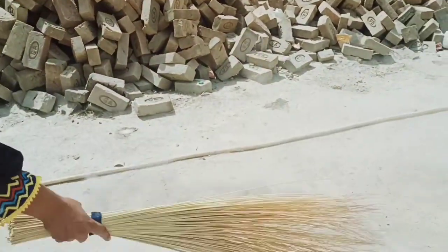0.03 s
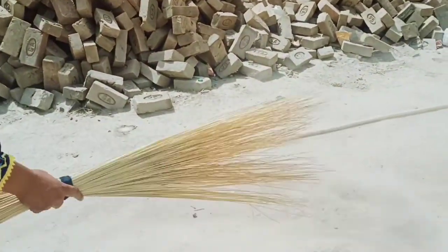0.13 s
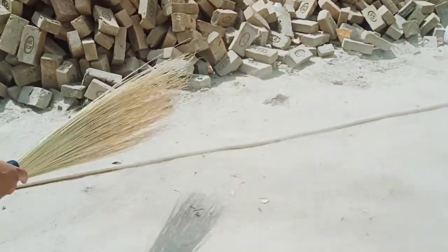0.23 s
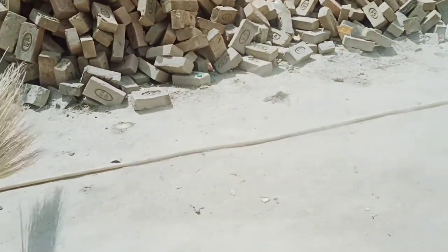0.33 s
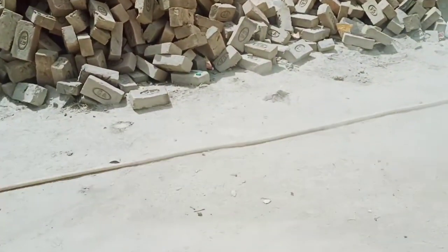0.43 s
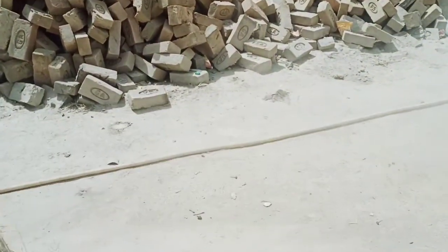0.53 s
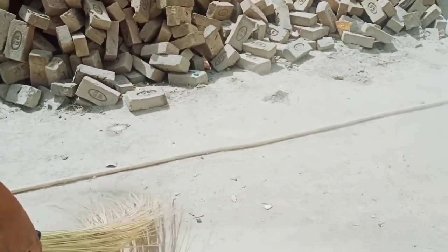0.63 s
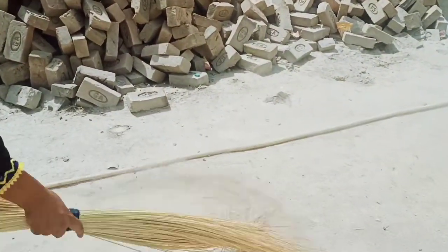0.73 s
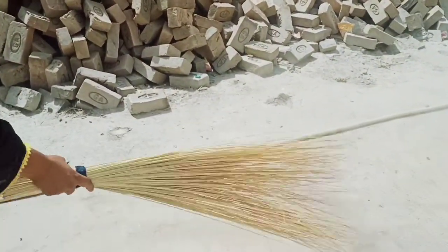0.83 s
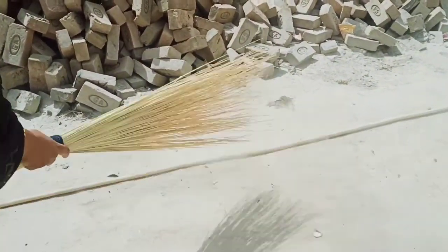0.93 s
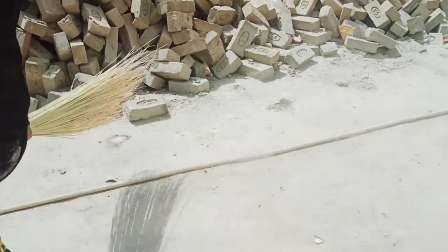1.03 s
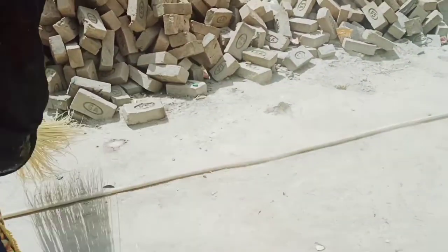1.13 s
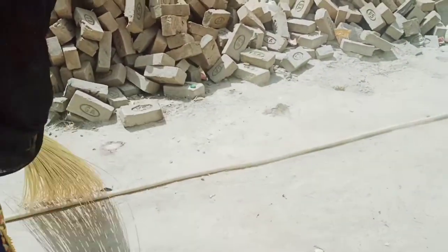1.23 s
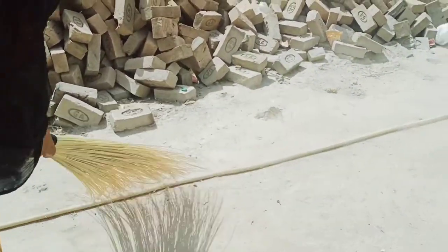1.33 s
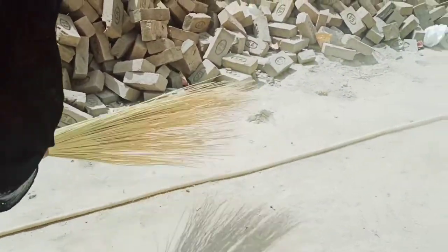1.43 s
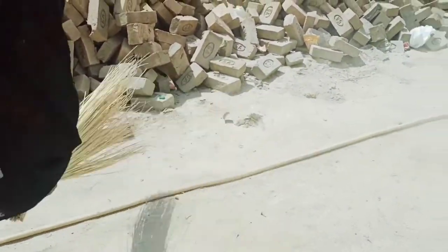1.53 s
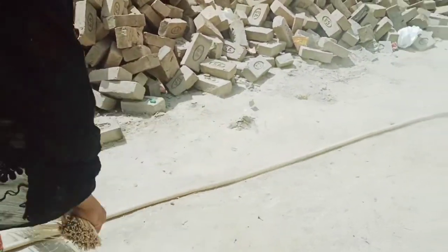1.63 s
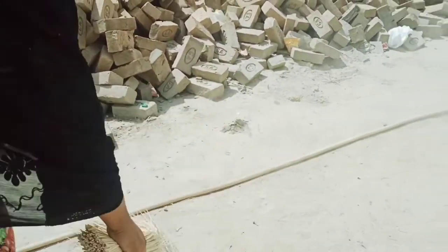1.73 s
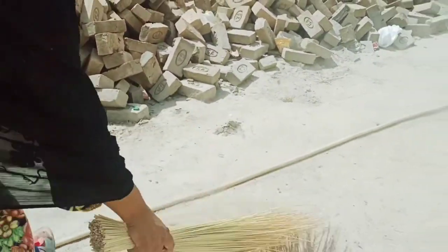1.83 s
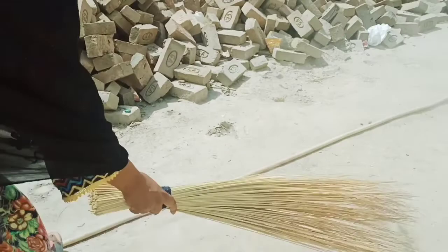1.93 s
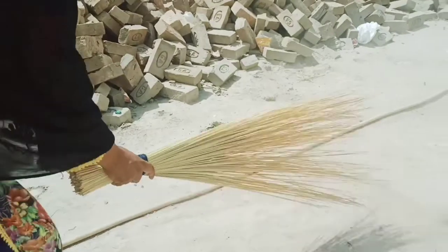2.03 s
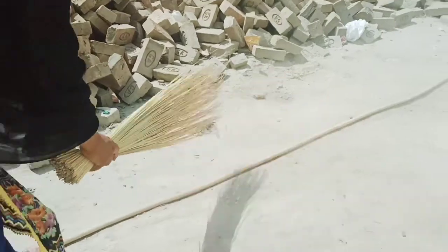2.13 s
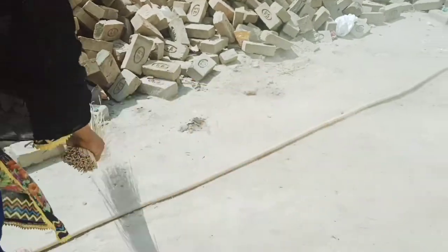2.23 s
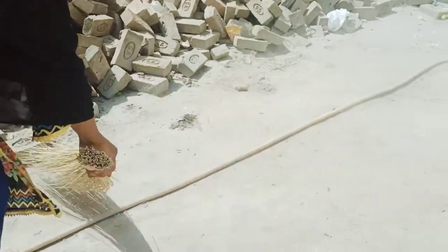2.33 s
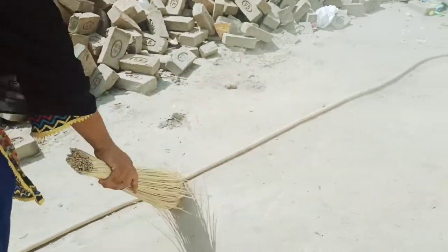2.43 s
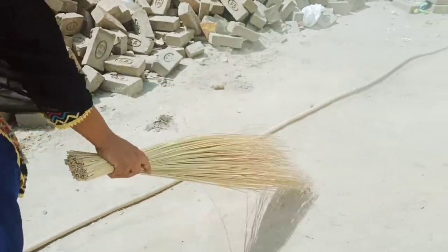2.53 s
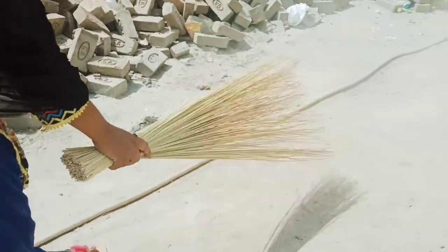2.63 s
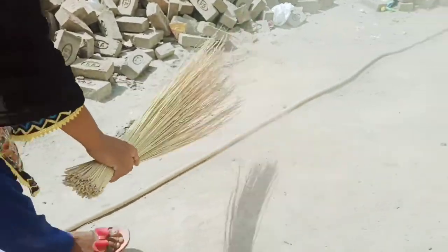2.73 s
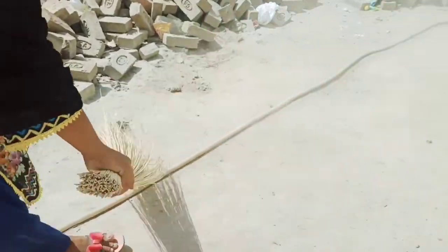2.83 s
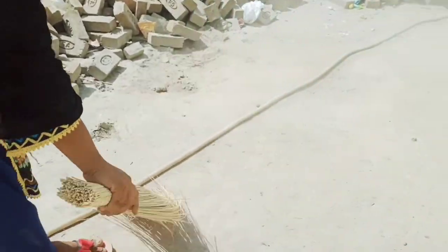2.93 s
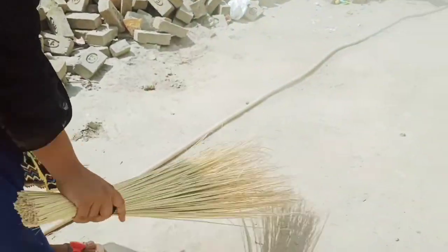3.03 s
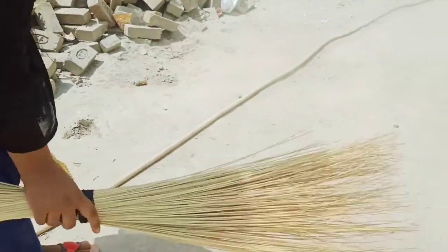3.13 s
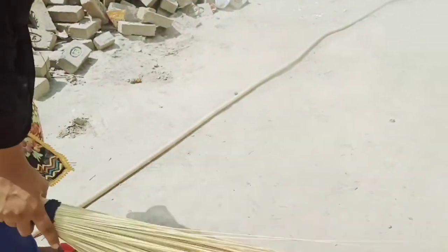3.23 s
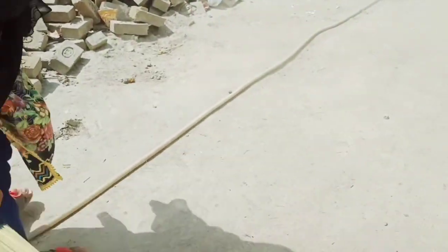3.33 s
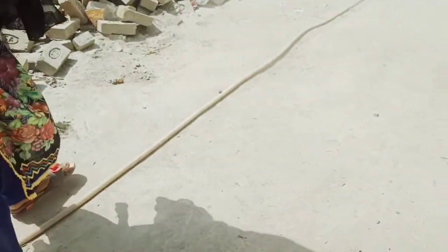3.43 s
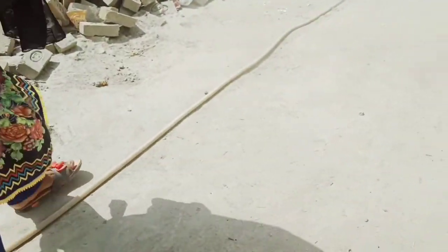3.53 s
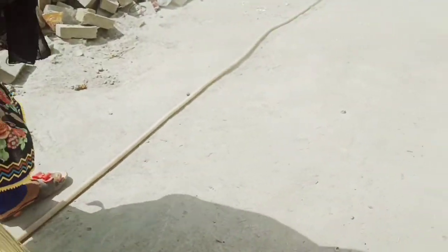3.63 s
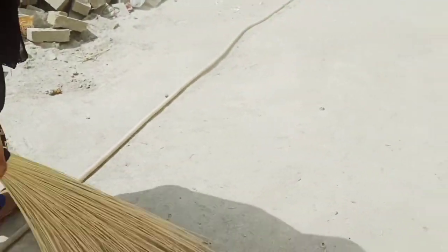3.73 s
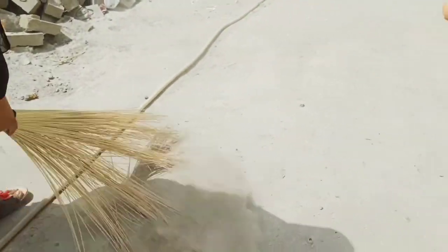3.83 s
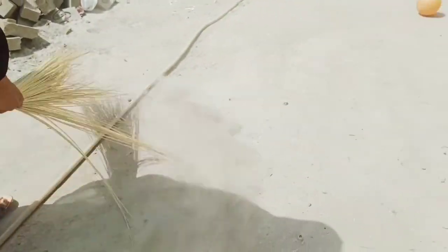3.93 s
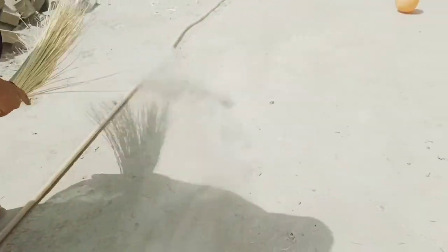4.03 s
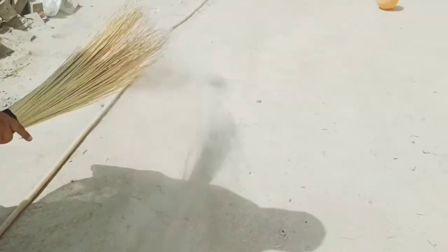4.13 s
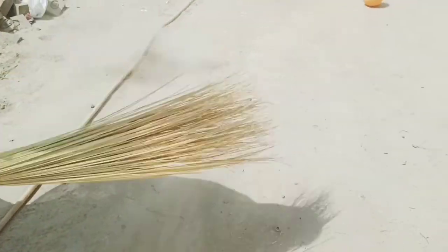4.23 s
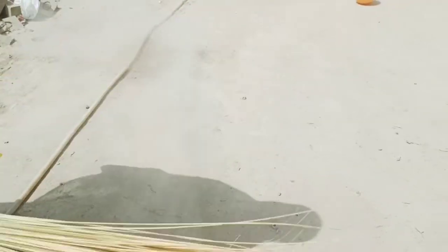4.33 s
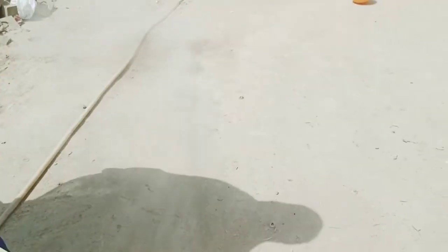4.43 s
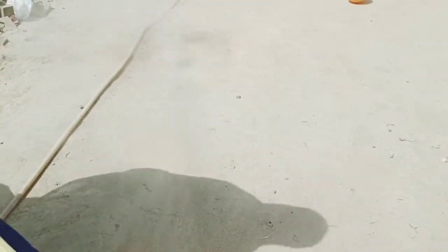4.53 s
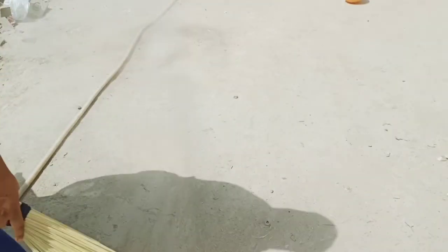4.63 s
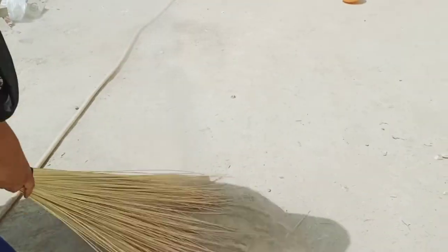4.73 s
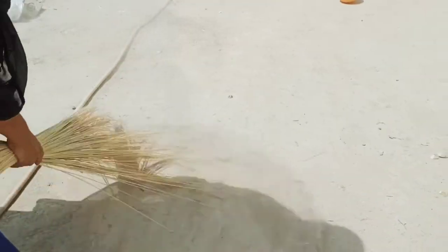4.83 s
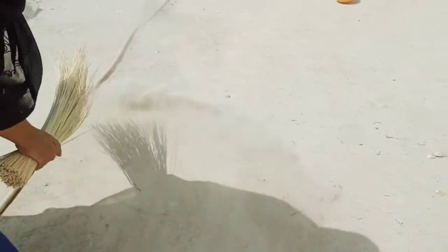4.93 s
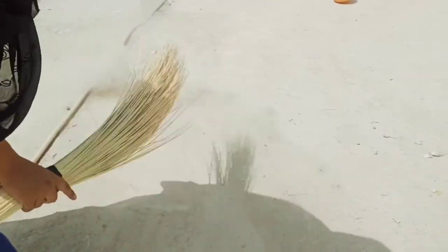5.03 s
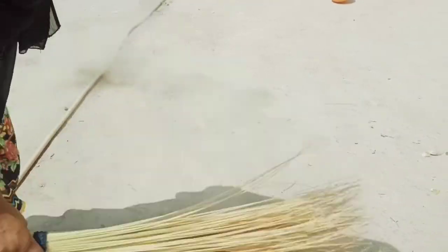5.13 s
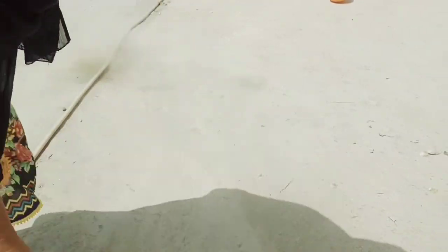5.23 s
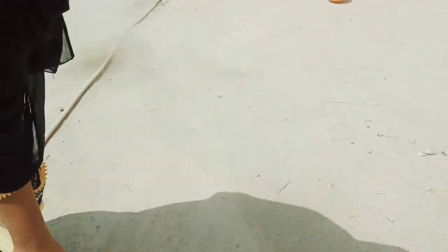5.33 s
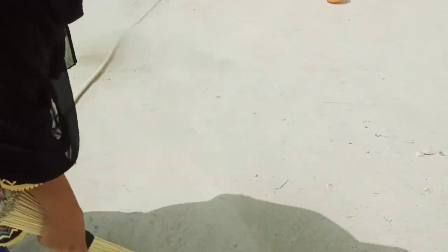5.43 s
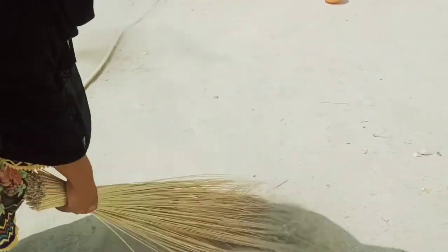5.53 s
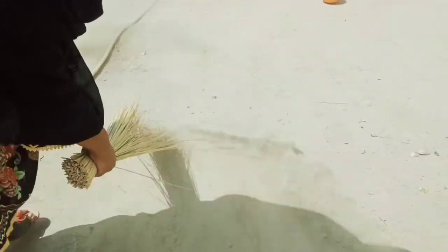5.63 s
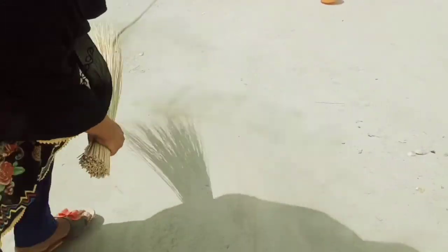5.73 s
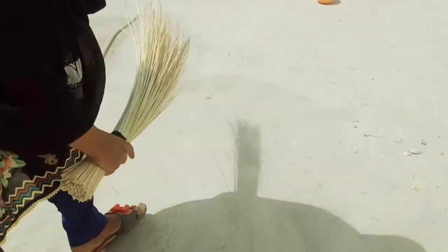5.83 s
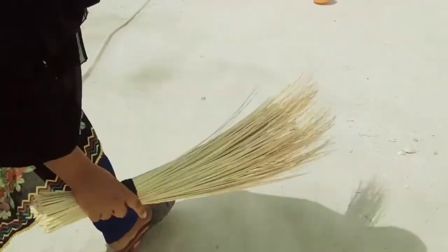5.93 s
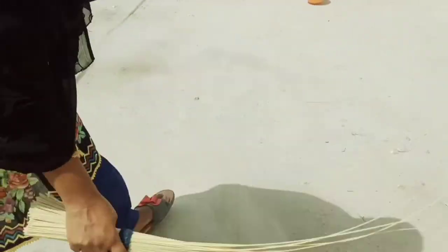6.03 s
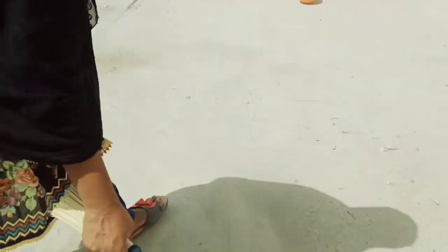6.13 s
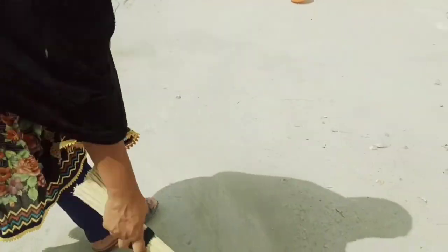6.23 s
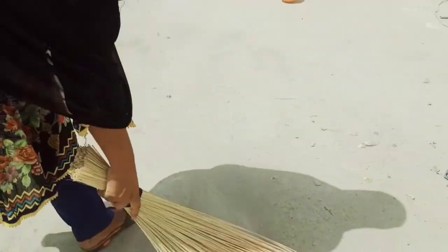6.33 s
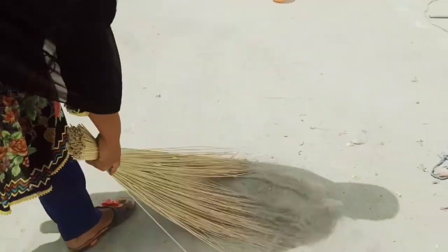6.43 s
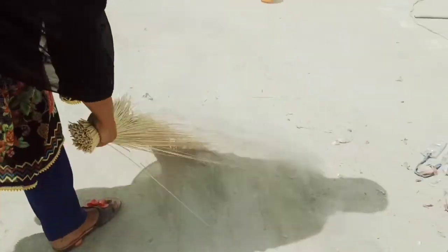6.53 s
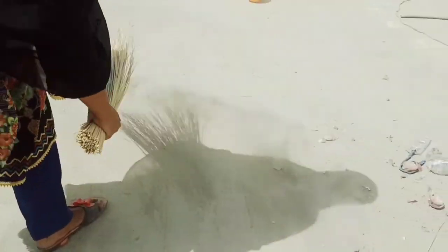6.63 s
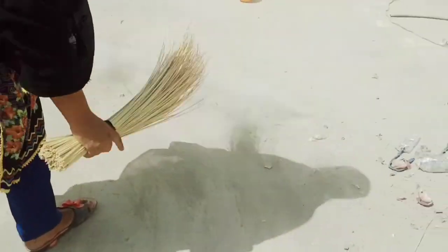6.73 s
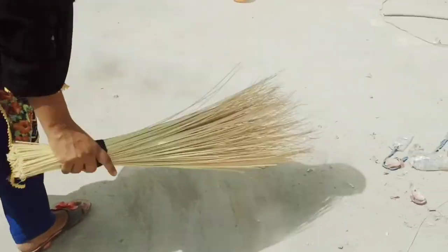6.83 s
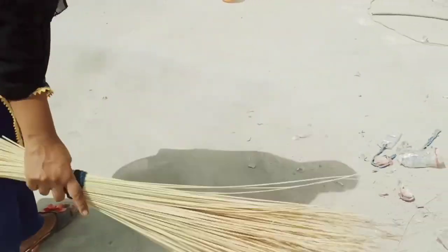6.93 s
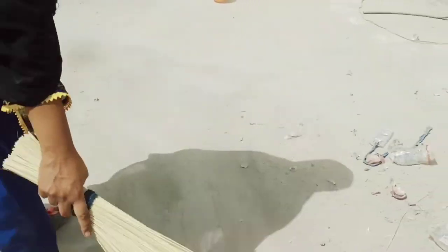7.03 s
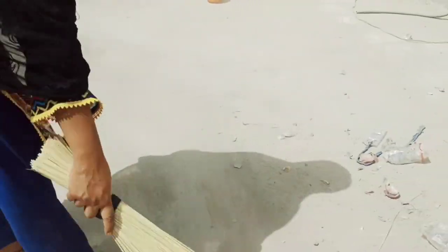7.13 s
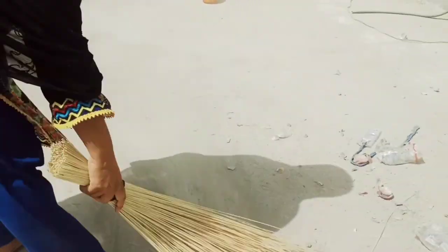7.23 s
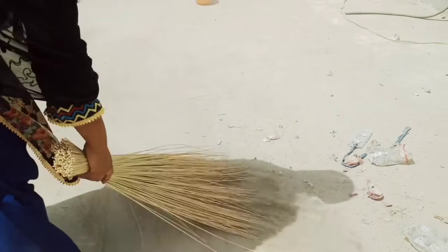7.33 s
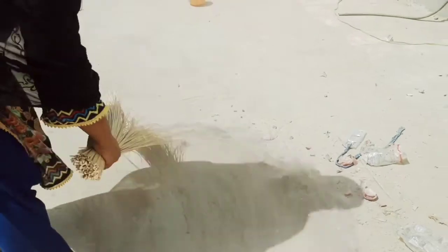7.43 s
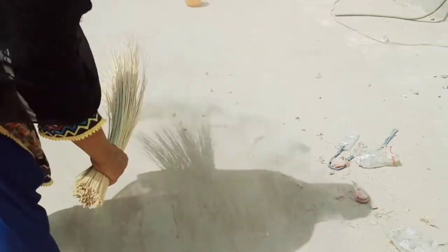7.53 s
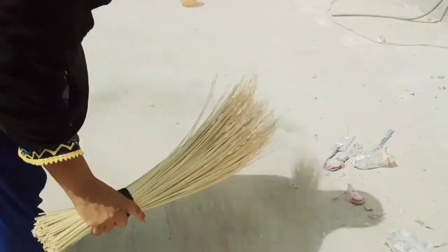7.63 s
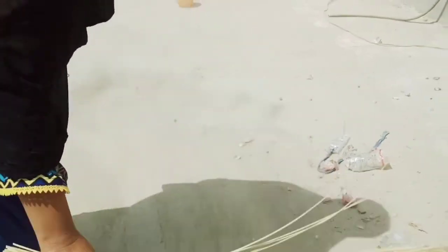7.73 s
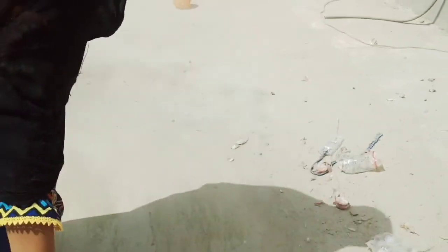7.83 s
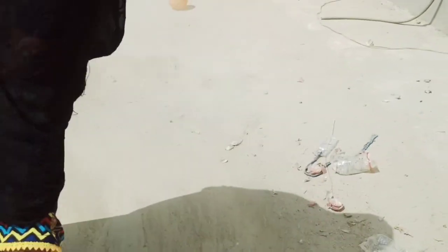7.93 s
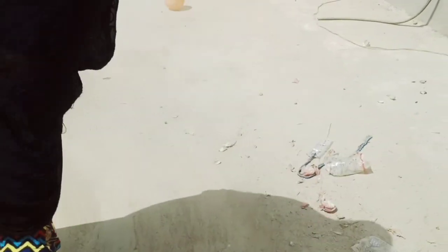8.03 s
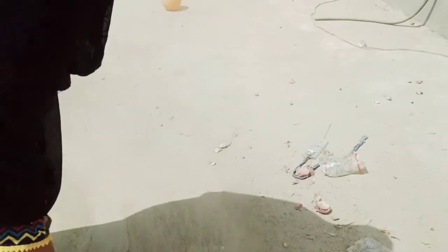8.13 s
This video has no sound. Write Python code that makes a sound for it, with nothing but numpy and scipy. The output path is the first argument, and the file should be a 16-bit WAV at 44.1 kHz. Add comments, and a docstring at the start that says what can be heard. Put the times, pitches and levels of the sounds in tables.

```python
"""Quick broom strokes hiss over dusty packed earth, close to a mono microphone.
The grass stems make a smooth rush of noise, coloured by pressure, with small ticks and bright crackles.
Birds call nearby as gliding tones with echoes; sandals knock and scuff as short tones and dull noise.
A few puffs of air buffet the microphone as slow wobbling tones, over a soft outdoor background of noise."""
import sys
import numpy as np
from scipy import signal
from scipy.fft import rfft, irfft
from scipy.io import wavfile

SR = 44100
rng = np.random.default_rng(int(sys.argv[2]) if len(sys.argv) > 2 else 0)


def materialize(psi):
    """Save the field psi as 16-bit PCM at rate SR to the path in sys.argv[1].

    A 1-D psi becomes a single channel; in a 2-D psi each row is a channel.
    """
    bounded = np.clip(np.atleast_2d(psi).T, -1, 1)
    quanta = np.round(bounded * 32767).astype(np.int16)
    wavfile.write(sys.argv[1], SR, quanta)


N = 360297
TIME = np.arange(N) / SR  # seconds
FREQS = np.maximum(np.arange(N // 2 + 1) * SR / N, 1)  # Hz
# colour of a light touch: thick stems, low rush, springy middle
DRAG_SCRAPE_DB, DRAG_RUSH_DB, DRAG_SPRING_DB = -10.5, 5, -2.5


def from_db(db):
    """Turn decibels into a gain."""
    return 10 ** (np.asarray(db) / 20)


def rms_one(x):
    """Scale a sound to an average strength (rms) of 1."""
    return x / np.sqrt(np.mean(x ** 2) + 1e-20)


def noise(length=N):
    """Plain random noise, the raw material of hiss and rumble."""
    return rng.standard_normal(length)


def in_time(rows):
    """Read each column of a curve at every sample; the first column is the time."""
    seconds, *columns = np.transpose(rows)
    return [np.interp(TIME, seconds, column) for column in columns]


def colour(x, points):
    """Filter a sound by a curve of frequency (Hz) and level (dB)."""
    hz, db = np.transpose(points)
    gain = from_db(np.interp(np.log(FREQS), np.log(hz), db))
    return irfft(rfft(x) * gain, N)


def band(x, low_hz, high_hz, order=2):
    """Keep only the sound between two frequencies."""
    edges = [low_hz, min(high_hz, .45 * SR)]
    return signal.sosfilt(signal.butter(order, edges, "band", fs=SR, output="sos"), x + 1e-18)


def drift(rate):
    """Smooth random wander of strength 1, up to about `rate` turns a second."""
    return rms_one(irfft(rfft(noise()) / (1 + (FREQS / rate) ** 2), N))


def add(out, s, sound):
    """Mix a sound in at a time in seconds."""
    at = max(round(s * SR), 0)
    out[at:at + len(sound)] += sound[:max(N - at, 0)]


def arch(length):
    """Progress from 0 to 1 through an event, and a rounded swell over it."""
    u = np.linspace(0, 1, int(length * SR))
    return u, np.abs(np.sin(np.pi * u))


def ease(u):
    """Smooth step from 0 to 1."""
    return .5 - .5 * np.cos(np.pi * np.clip(u, 0, 1))


def sing(hz):
    """A pure tone of rms 1 that follows a pitch track."""
    return np.sqrt(2) * np.sin(2 * np.pi * np.cumsum(hz) / SR)


def stroke(t, press_s, push_s, lift_s, landing_db, full_db, scrape_db, rush_db, spring_db, tips_db):
    """Gain and colour of a stroke: coarse as the push begins, brightest as the tips leave the ground."""
    land_s, lift_drop_db = 0.027, 19  # landing time; fall over the lift
    trail_db, trail_db_per_s = -17, 104  # a few stems trail on after the lift
    past_push = t - press_s - push_s
    lifted = np.maximum(past_push, 0)
    pushed = np.clip((t - press_s) / push_s, 0, 1)
    pressing_db = (landing_db - full_db) * (1 - ease(t / press_s))
    # the push swells; with a lift quicker than 0.15 s it also gains force, with a slower one it loses it
    swell_db = 0.9 * np.sin(np.pi * pushed)
    lean_db = 2.5 * np.log(0.15 / lift_s) * (pushed - .5)
    lifting_db = np.maximum(-lift_drop_db * lifted / lift_s, trail_db - trail_db_per_s * lifted)
    pressure_db = pressing_db + swell_db + lean_db + lifting_db
    gain = ease(t / land_s + .5) * from_db(full_db + pressure_db)

    # the thick stems bite hardest where the push begins
    bite_db, bite_s = 3.5, 0.14
    bite = np.exp(-((t - press_s) / bite_s) ** 2)
    # the bundle rolls onto its tips as it leaves the ground; a quicker lift flares more
    snap_s, flare_s = 0.11, 0.038
    flare = snap_s / lift_s * np.exp(-np.abs(past_push) / flare_s)
    treble_db = -1.4  # resting treble, before any flare
    # each dB of lost pressure shifts the colour
    lost_db = np.minimum(-pressure_db, 30)
    return gain, [scrape_db + 0.26 * lost_db + bite_db * (bite - .5),
                  rush_db,
                  spring_db - 0.12 * lost_db + 8.5 * flare + treble_db,
                  tips_db - 0.084 * lost_db + 10 * flare + treble_db]


def drag(t, length, level_db, tips_db):
    """Gain and colour of a light drag of the bundle on its way back: on, slowly sagging, off."""
    edge_s, sag_db = 0.057, 1  # time to start or stop; loss from start to end
    touching = ease(t / edge_s + .5) * ease((length - t) / edge_s + .5)
    sagging_db = level_db + sag_db * (1.5 - np.clip(t / length, 0, 1))
    return touching * from_db(sagging_db), [DRAG_SCRAPE_DB, DRAG_RUSH_DB, DRAG_SPRING_DB, tips_db]


def contact():
    """Force and four colours (dB) over time: touches add in power, and the strongest counts most."""
    # Strokes: the broom lands, is pressed down, pushed along and lifted. Each row: start, press time,
    # push time and lift time in seconds, landing and full force in dB, then the basic colour in dB:
    # thick stems, low rush, springy middle, fine tips.
    stroke_rows = [(0.0, 0.044, 0.008, 0.094, -33, -31.5, -16, 1, -10, -18),
                   (0.42, 0.2, 0.036, 0.23, -46.5, -23.5, -18.5, 0.5, -3.5, -10.5),
                   (1.135, 0.11, 0.079, 0.14, -39, -28, -17, 1.5, 3, -8),
                   (1.634, 0.13, 0.06, 0.13, -34.5, -24.5, -18.5, 4, -1.5, -11),
                   (2.23, 0.16, 0.095, 0.1, -50.5, -25.5, -20, -1.5, -2.5, -11),
                   (2.846, 0.091, 0.043, 0.13, -33.5, -27.5, -19.5, -2, -2.5, -9.5),
                   (3.48, 0.23, 0.2, 0.3, -50.5, -26.5, -15.5, -1, -3, -6),
                   (4.035, 0.01, 0.03, 0.13, -30, -31.5, -17, -1.5, 1, -5.5),
                   (4.48, 0.18, 0.15, 0.24, -49.5, -28, -14.5, -0.5, -4.5, -0.5),
                   (5.259, 0.21, 0.091, 0.23, -45.5, -28.5, -15, 1.5, -1, -0.5),
                   (6.15, 0.19, 0.18, 0.18, -45.5, -28, -15.5, 0, -1, -2.5),
                   (7.035, 0.2, 0.13, 0.21, -43.5, -28, -15.5, 0.5, -0.5, -4),
                   (7.889, 0.22, 0.19, 0.2, -47, -32, -14.5, 6, -2, -4)]
    # Light drags on the way back. Each row: start and length in seconds, basic force in dB, fine tips in dB.
    drag_rows = [(0.109, 0.14, -52.5, -5), (0.376, 0.05, -74, -12), (0.966, 0.18, -52.5, -6),
                 (1.414, 0.075, -45, 0), (1.482, 0.23, -51, -14), (1.933, 0.22, -51.5, -5),
                 (2.602, 0.13, -50.5, 3), (2.16, 0.054, -64, -12), (2.772, 0.13, -55.5, -14),
                 (3.33, 0.086, -51, -3), (3.41, 0.09, -59.5, -1), (4.2, 0.12, -57.5, -13),
                 (4.33, 0.25, -58, -15), (4.923, 0.06, -43, -1), (5.105, 0.42, -50.5, -8),
                 (5.75, 0.188, -51.5, 2), (5.928, 0.25, -54.5, -11), (6.6, 0.24, -44.5, -5),
                 (6.842, 0.2, -53, -13), (7.485, 0.058, -45, -8), (7.585, 0.13, -48.5, -3)]
    t = TIME[::40]  # slow curves need fewer points
    touches = [stroke(t - s, *row) for s, *row in stroke_rows]
    touches += [drag(t - s, *row) for s, *row in drag_rows]
    # the dry bundle stirring in the air
    touches.append((from_db(-66), [DRAG_SCRAPE_DB, DRAG_RUSH_DB, DRAG_SPRING_DB, -9]))
    power = sum(gain ** 2 for gain, _ in touches)
    colours = [sum(gain ** 2 * tint[k] for gain, tint in touches) / power for k in range(4)]
    return in_time(np.column_stack([t, 10 * np.log10(power), *colours]))


def stem_contacts(force_db, ticks_per_s, spread_db, tick_db, flutter_db):
    """Pressed stems merge into a smooth rush; under a light touch single ticks stand out."""
    sizes = from_db(spread_db * np.minimum(rng.exponential(1, N), 3))
    hits = sizes ** 2 * (rng.random(N) < ticks_per_s / SR)
    tick_power = signal.lfilter([1], [1, -.93], hits + 1e-18)  # each tick dies away quickly
    ticks = noise() * np.sqrt(np.abs(tick_power))
    share = np.minimum(from_db(tick_db - .3 * (force_db + 45)), .65)
    rush = noise() * from_db(flutter_db * drift(27))
    return np.sqrt(1 - share ** 2) * rush + share * rms_one(ticks)


def bounce(x, force_db, strength, lag_s, wander):
    """A nearby surface mirrors the hiss; the path changes as the broom swings, so the notches glide."""
    lag = lag_s * np.exp(wander * drift(0.99) - 0.00574 * (force_db + 30))
    delayed = np.interp(TIME - lag, TIME, x)
    return (x + strength * delayed) / np.hypot(1, strength)


def broom(force_db, scrape_db, rush_db, spring_db, tips_db):
    """Friction noise in overlapping registers, from the thick stems to the finest tips."""
    # Basic colour of the hiss. Each row: frequency in Hz, relative level in dB per Hz.
    hiss_curve = [(250, -29), (530, -22.5), (750, -17), (1120, -19.5), (1550, -12.5), (2350, -12),
                  (3900, -4.5), (4550, -5), (6200, 1.5), (7300, -1), (8700, -6), (9900, -6.5),
                  (11400, -0.5), (15500, -11)]
    scrape_db = np.minimum(scrape_db, -4)  # keeps the thick stems in check
    rub = stem_contacts(force_db, ticks_per_s=600, spread_db=12.0, tick_db=-9.5, flutter_db=0.55)
    rub = bounce(rub, force_db, strength=0.29, lag_s=0.0008, wander=0.25)  # the ground
    rub = bounce(rub, force_db, strength=0.15, lag_s=0.0035, wander=0.049)  # the sweeper's legs
    spectrum = rfft(colour(rub, hiss_curve))
    unit = np.std(band(irfft(spectrum, N), 5000, 10000, order=6))
    # Each row: centre in Hz, level in dB; every register fades into its neighbours.
    registers = [(1800, scrape_db + 17.5), (3500, rush_db), (6200, 0), (9300, 0.37 * spring_db + 1.5),
                 (11500, spring_db + 2.5), (13800, tips_db + 10.5)]
    centres_hz = [hz for hz, db in registers]
    hiss = np.zeros(N)
    for shares, (hz, db) in zip(np.eye(len(registers)), registers):
        register = irfft(spectrum * np.interp(FREQS, centres_hz, shares), N)
        hiss += from_db(db) * register
    return from_db(force_db - 0.9) * hiss / unit


def flicks(t60):
    """Stems slap down or flick free in short bright crackles that fade by 60 dB in t60 seconds."""
    # Each row: start in seconds, level in dB.
    flick_rows = [(0.034, -33), (0.195, -55), (1.02, -46), (1.629, -32), (2.227, -44), (2.79, -45),
                  (2.846, -45), (3.285, -47.5), (4.034, -24), (4.214, -46), (4.298, -37.5), (5.045, -44),
                  (5.258, -42), (6.143, -43), (6.62, -36), (6.814, -44), (6.982, -51), (7.591, -36)]
    strength, t = np.zeros(N), TIME[:SR // 8]
    for s, db in flick_rows:
        add(strength, s, from_db(db - 60 * t / t60))
    return strength * rms_one(band(noise(), 4200, 11000))


def steps(t60, tail_db, tail_t60, slap_db, level_db):
    """Footfalls and soft knocks: a hollow low knock with a faint longer ring, and the slap of a sole."""
    # Each row: time in seconds, knock level in dB before the common level_db, pitch in Hz.
    step_rows = [(0.901, -37, 224), (1.044, -34, 385), (2.358, -42, 270), (2.857, -35, 327),
                 (2.941, -33, 248), (3.55, -34, 333), (4.153, -36, 259), (4.428, -37, 199),
                 (4.447, -59.5, 273), (7.713, -24.5, 162), (7.874, -17.5, 247)]
    out, t = np.zeros(N), TIME[:SR // 4]
    for s, db, hz in step_rows:
        fade = from_db(-60 * t / t60) + from_db(tail_db - 60 * t / tail_t60)
        knock = np.sin(2 * np.pi * hz * t) * fade * (1 - np.exp(-t / 0.0023))  # softened start
        slap = rms_one(band(noise(len(t)), 500, 1020, order=3)) * from_db(slap_db - 60 * t / 0.061)
        add(out, s - .002, from_db(db + level_db) * knock + slap)
    return out


def scuffs(low_hz, high_hz):
    """A sandal sole slides a little way in the dust: a dull gritty swell."""
    # Each row: start in seconds, length in seconds, level in dB.
    scuff_rows = [(1.0, 0.23, -62.5), (4.242, 0.14, -49.5), (5.073, 0.18, -52), (5.85, 0.27, -51),
                  (6.76, 0.13, -48.5), (7.805, 0.14, -52.5)]
    force = np.zeros(N)
    for s, length, db in scuff_rows:
        add(force, s, from_db(db) * arch(length)[1])
    grit = band(noise(), low_hz, high_hz) * from_db(3.2 * drift(60))
    return force * rms_one(grit)


def shake_at(quaver, s, u):
    """The stretch of the birds' shared pitch wobble that begins with a call."""
    return np.roll(quaver, -int(s * SR))[:len(u)]


def falling_calls(quaver):
    """Rough calls: a tone glides down, fading, while its pitch trembles fast."""
    # Each row: start and length in seconds, start and end pitch in Hz, basic level in dB.
    fall_rows = [(0.965, 0.056, 3620, 2640, -53), (5.015, 0.13, 4280, 1570, -45),
                 (6.88, 0.145, 4880, 1458, -38), (7.112, 0.1, 3890, 1880, -38),
                 (7.679, 0.062, 2560, 1290, -50), (8.091, 0.04, 3600, 2680, -39)]
    bend, fade_db, rough = -0.11, 23, 0.055  # sag of the glide (share), loss over a call, trembling (share)
    out = np.zeros(N)
    for s, length, start_hz, end_hz, db in fall_rows:
        u, swell = arch(length)
        glide = start_hz * (end_hz / start_hz) ** u * (1 + bend * swell)
        tone = sing(glide * (1 + rough * shake_at(quaver, s, u)))
        add(out, s, from_db(db + fade_db * (0.5839 - u)) * swell * tone)
    return out


def chatter(quaver, swoops_per_s, swoop_depth, rasp):
    """Harsh notes: uneven pulses in the throat keep swooping the pitch down."""
    # Each row: start and length in seconds, upper pitch in Hz, level in dB between swoops.
    chatter_rows = [(5.71, 0.091, 3865, -41), (5.869, 0.099, 3870, -39), (6.036, 0.095, 3920, -38.5),
                    (6.194, 0.11, 4000, -37.5), (6.553, 0.074, 4070, -39.5), (6.713, 0.085, 3850, -40.5)]
    out = np.zeros(N)
    for s, length, hz, db in chatter_rows:
        u, swell = arch(length)
        shake = shake_at(quaver, s, u)
        turns = np.cumsum(swoops_per_s * np.exp(.5 * shake)) / SR
        swoop = (turns % 1) ** 5 * rng.random(64)[turns.astype(int) % 64]  # each to its own depth
        tone = sing(hz * (1 - swoop_depth * swoop + rasp * shake))
        add(out, s, from_db(db - 2.0 * swoop) * swell * tone)
    return out


def whistles(quaver):
    """Clear whistles: a tone with a slight tremble that starts level and glides late."""
    # Each row: start and length in seconds, start and end pitch in Hz, level in dB.
    whistle_rows = [(1.06, 0.05, 3550, 4200, -55), (3.167, 0.14, 3870, 3600, -63),
                    (4.126, 0.11, 3650, 3500, -54), (4.485, 0.11, 1560, 1430, -50.5),
                    (5.948, 0.16, 4320, 6480, -49), (6.97, 0.09, 4550, 6100, -52),
                    (7.487, 0.069, 2597, 2980, -40.5), (7.577, 0.068, 3500, 3260, -42),
                    (7.611, 0.077, 2680, 2450, -39.5), (8.106, 0.08, 2786, 2730, -36.5)]
    bend, rough = 1.4, 0.022  # above 1 the glide comes late; trembling (share of the pitch)
    out = np.zeros(N)
    for s, length, start_hz, end_hz, db in whistle_rows:
        u, swell = arch(length)
        glide = start_hz * (end_hz / start_hz) ** (u ** bend)
        add(out, s, from_db(db) * swell * sing(glide * (1 + rough * shake_at(quaver, s, u))))
    return out


def yard(x, t60, wet_db, wall_lag_s, wall_db):
    """One clear echo from a nearby wall, then scattered ones from the brick piles."""
    x = x + from_db(wall_db) * np.interp(TIME - wall_lag_s, TIME, x)
    t = TIME[:SR // 2]
    sparse = (rng.random(len(t)) < .03) * (t > .008)
    echoes = noise(len(t)) * sparse * from_db(-60 * t / t60)
    return x + from_db(wet_db) * signal.fftconvolve(x, echoes / np.linalg.norm(echoes))[:N]


def birds():
    """Falling calls and chatter with a longer echo, and clear whistles with a shorter one."""
    quaver = drift(730)
    rough = falling_calls(quaver) + chatter(quaver, swoops_per_s=59, swoop_depth=0.65, rasp=0.0444)
    return (yard(rough, t60=0.37, wet_db=-5.5, wall_lag_s=0.013, wall_db=-6.5)
            + yard(whistles(quaver), t60=0.21, wet_db=-4.0, wall_lag_s=0.013, wall_db=-10.5))


def puffs(eddy_hz, scatter, tumble_db):
    """Each gust rolls a few slow eddies over the microphone port, with finer turbulence on top."""
    # Each row: middle in seconds, length in seconds, level in dB.
    puff_rows = [(0.05, 0.13, -48), (1.749, 0.09, -39), (5.121, 0.085, -46), (5.197, 0.11, -45),
                 (7.495, 0.12, -52), (7.565, 0.077, -34.5), (7.63, 0.24, -39.5), (7.732, 0.07, -38.5),
                 (7.761, 0.033, -39.5)]
    eddies = sing(eddy_hz * np.exp(scatter * drift(52.0)))
    turbulence = from_db(tumble_db) * rms_one(band(noise(), 58, 167))
    force = np.zeros(N)
    for s, length, db in puff_rows:
        add(force, s - length / 2, from_db(db) * arch(length)[1] ** 2)
    return band(force * (eddies + turbulence), 37, 520)


def background(force_db):
    """Distant outdoor rumble, with the soft rustle of the sweeper's clothes, which grows with effort."""
    # Outdoor air. Each row: frequency in Hz, relative level in dB per Hz.
    air_curve = [(25, -41), (45, -8), (75, 3), (120, 3), (200, -6), (400, -28), (520, -10), (800, -7),
                 (1150, -15.5), (1700, -10), (2400, -16.5), (3800, -10.5), (7000, -17.5), (15500, -26.5)]
    air = from_db(-54) * rms_one(colour(noise(), air_curve))
    rest_db, effort_db, follows = -60, -57, 0.24  # at rest; added at full effort; share of the broom's swing
    effort = from_db(effort_db + follows * (force_db - force_db.max()))
    rustle = np.hypot(from_db(rest_db), effort) * from_db(2.2 * drift(3.5))
    return air + rustle * rms_one(band(noise(), 190.0, 453, order=3))


def scene():
    """Everything reaches one microphone, alike in both channels."""
    force_db, *colours_db = contact()
    # a light touch wavers over uneven ground
    lightness = ease((force_db.max() - force_db) / 30)
    force_db = force_db + 1.5 * lightness * drift(21)
    mono = broom(force_db, *colours_db) + flicks(t60=0.042)
    mono += steps(t60=0.033, tail_db=-16.5, tail_t60=0.28, slap_db=-48.0, level_db=-3.5)
    mono += scuffs(low_hz=374, high_hz=1250)
    mono += birds()
    mono += puffs(eddy_hz=67.95, scatter=0.25, tumble_db=-4.5)
    mono += background(force_db)
    return np.array([mono, mono])


def record(dry):
    """A steep filter removes the top of the treble, above 15550 Hz."""
    return signal.sosfilt(signal.ellip(12, .1, 80, 15550, fs=SR, output="sos"), dry)


dry = scene()
out = record(dry)
materialize(out)
```